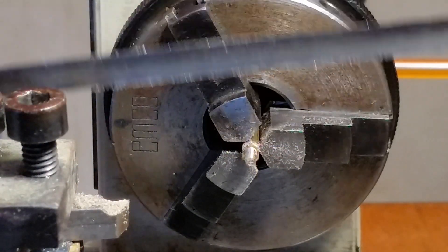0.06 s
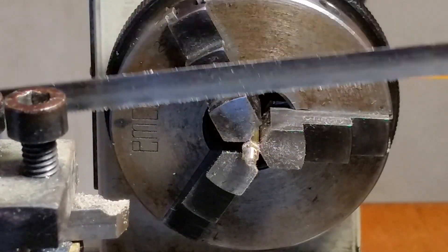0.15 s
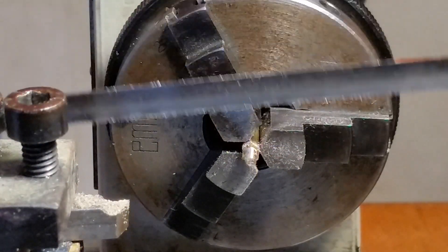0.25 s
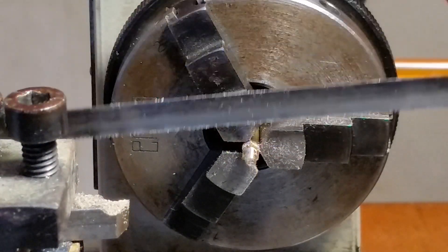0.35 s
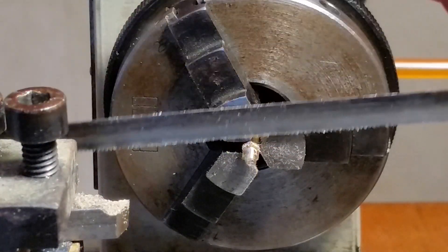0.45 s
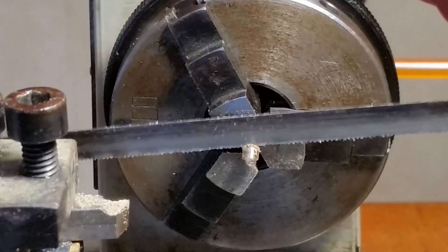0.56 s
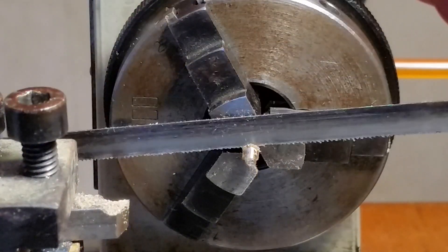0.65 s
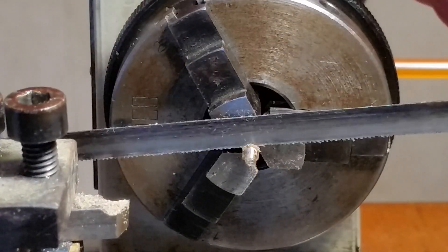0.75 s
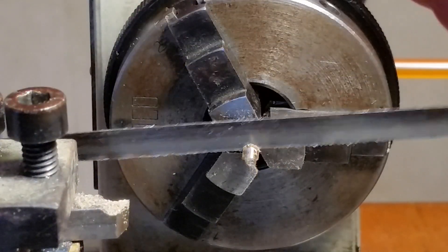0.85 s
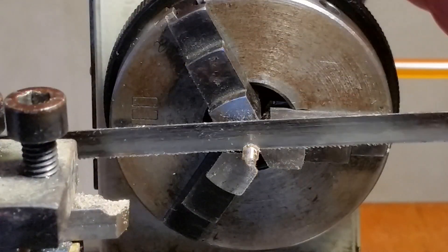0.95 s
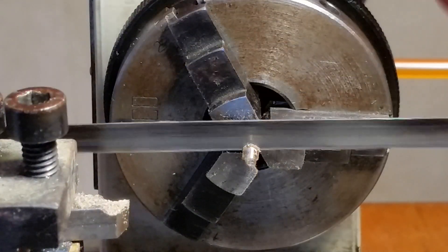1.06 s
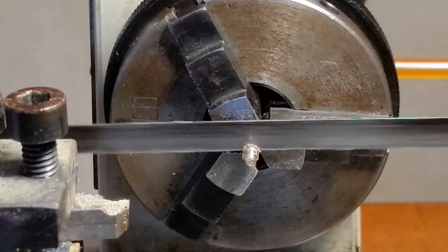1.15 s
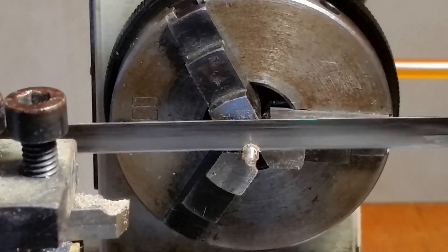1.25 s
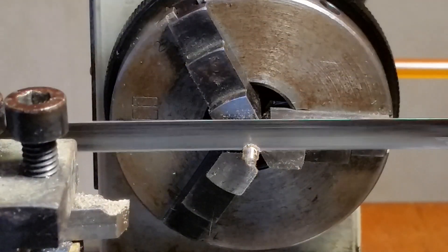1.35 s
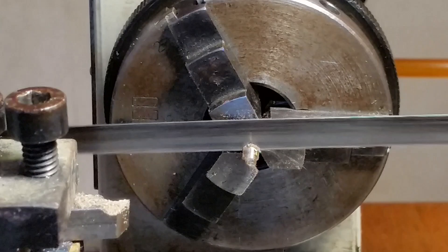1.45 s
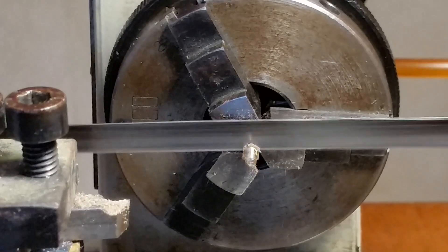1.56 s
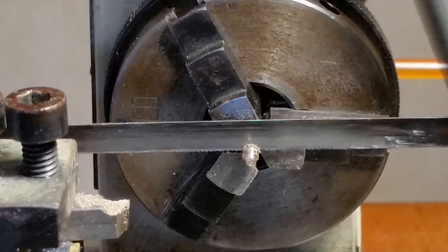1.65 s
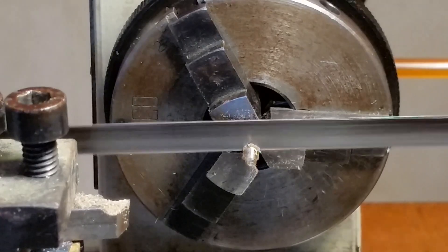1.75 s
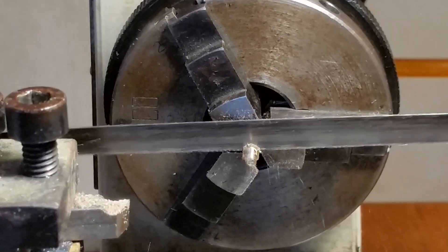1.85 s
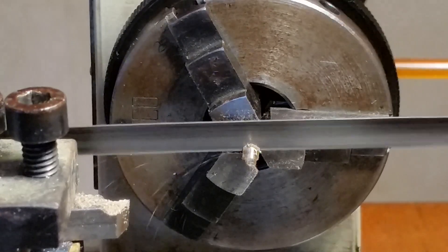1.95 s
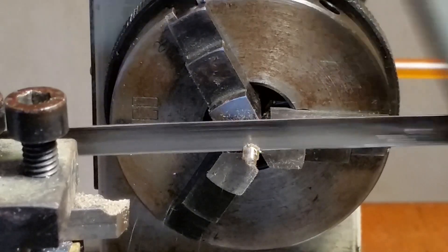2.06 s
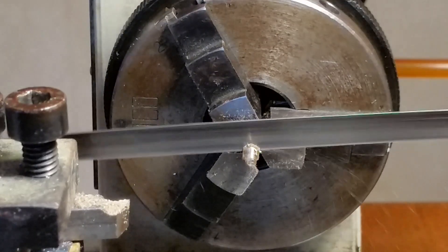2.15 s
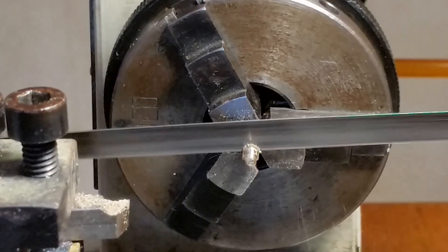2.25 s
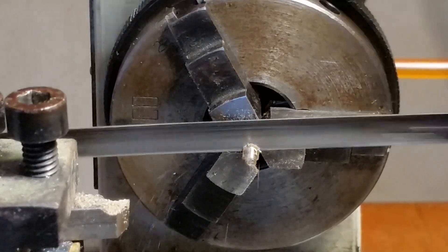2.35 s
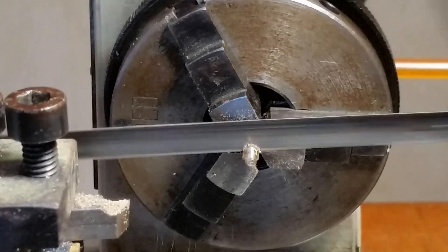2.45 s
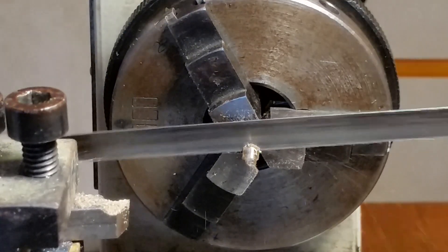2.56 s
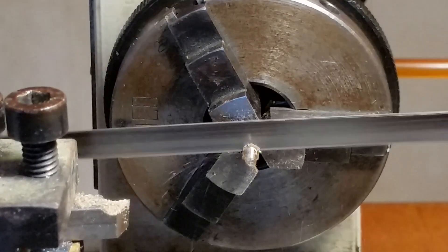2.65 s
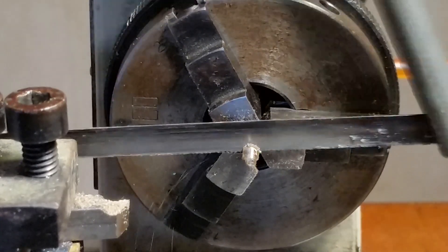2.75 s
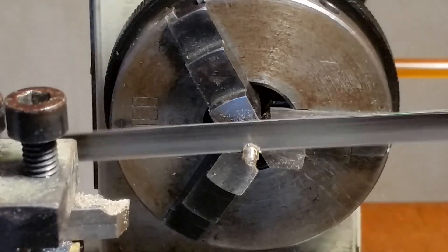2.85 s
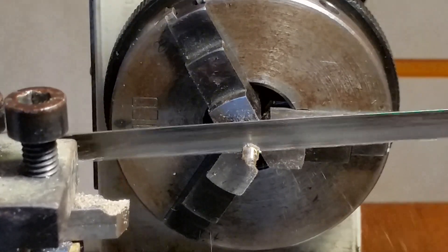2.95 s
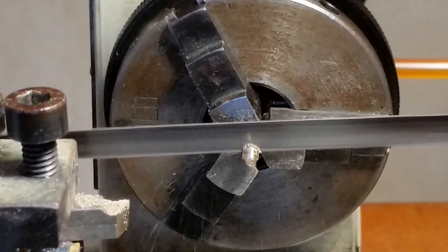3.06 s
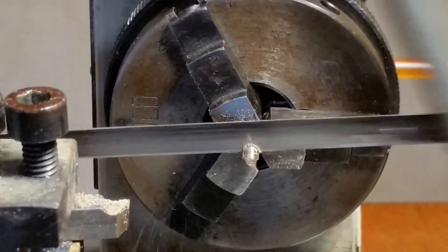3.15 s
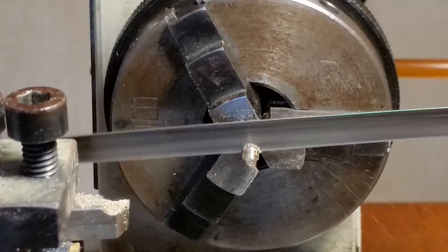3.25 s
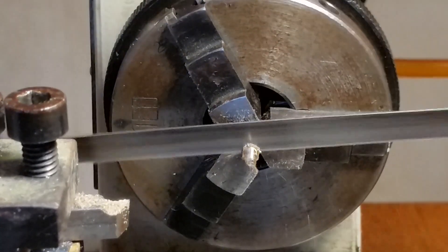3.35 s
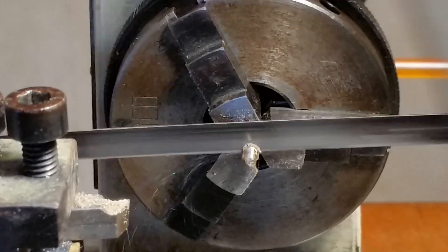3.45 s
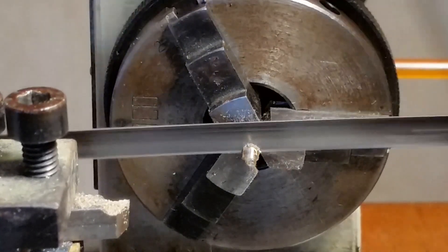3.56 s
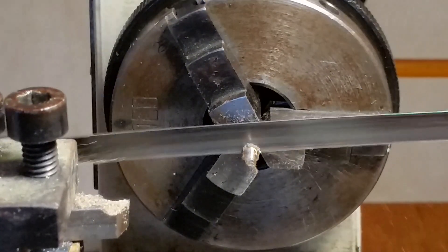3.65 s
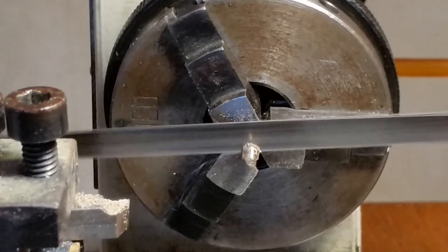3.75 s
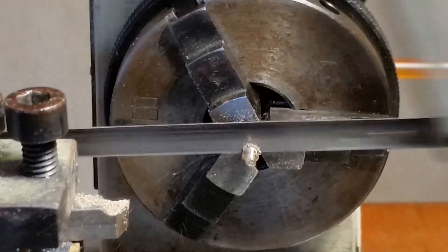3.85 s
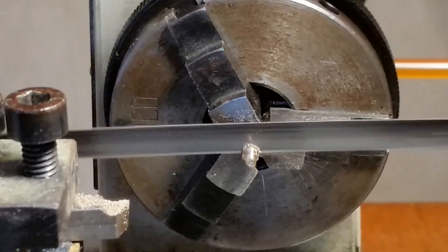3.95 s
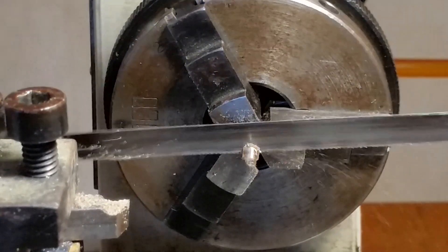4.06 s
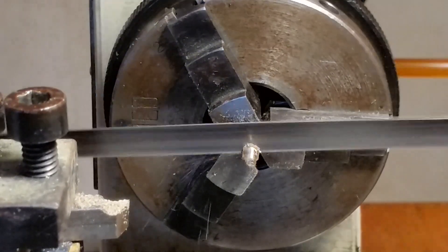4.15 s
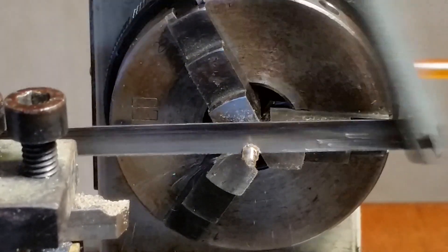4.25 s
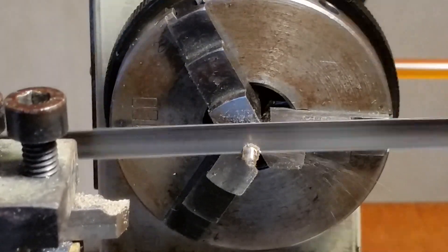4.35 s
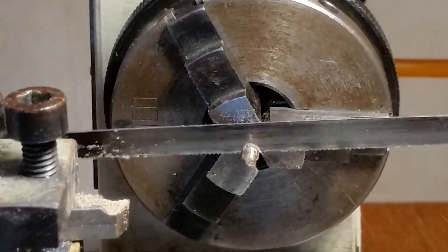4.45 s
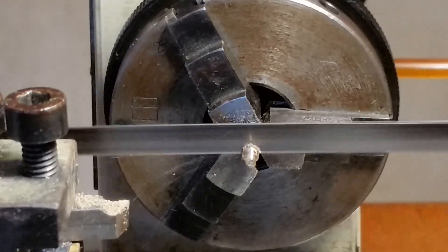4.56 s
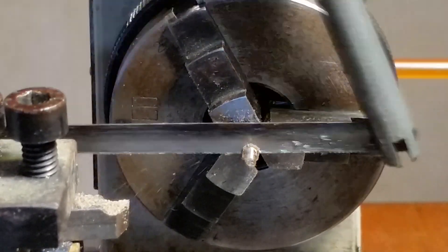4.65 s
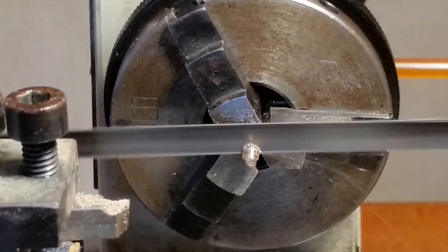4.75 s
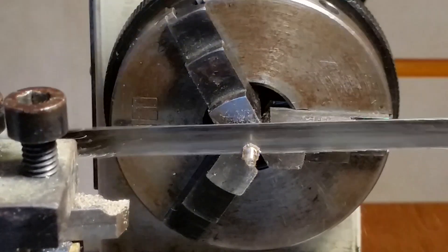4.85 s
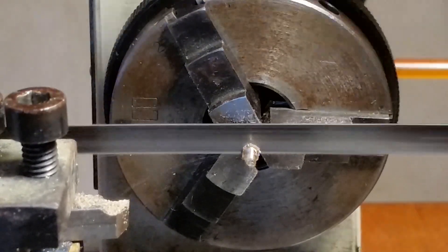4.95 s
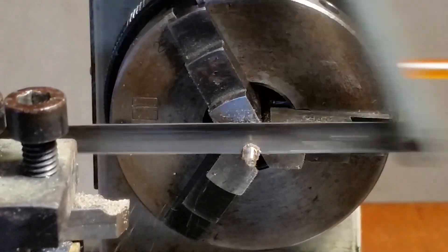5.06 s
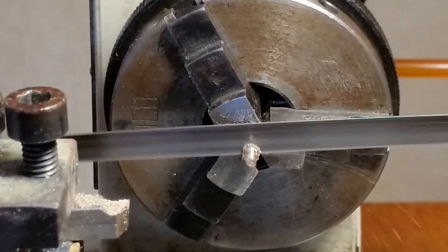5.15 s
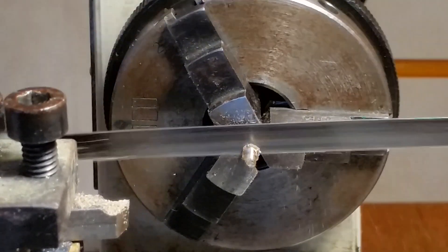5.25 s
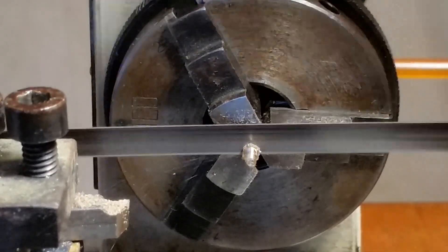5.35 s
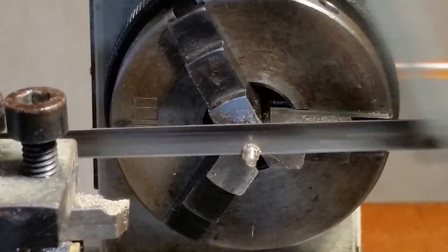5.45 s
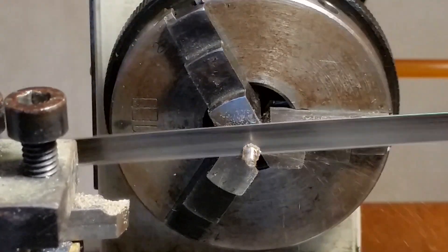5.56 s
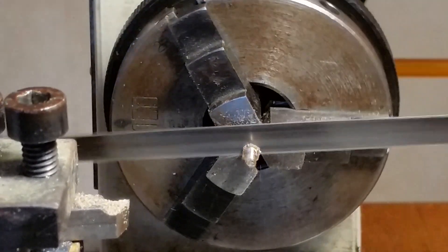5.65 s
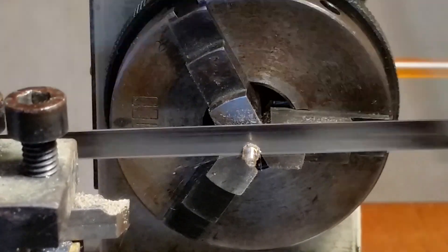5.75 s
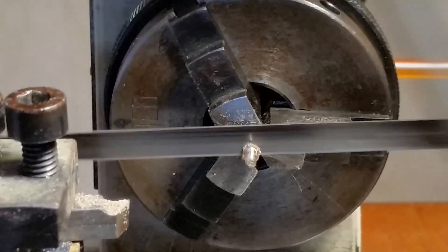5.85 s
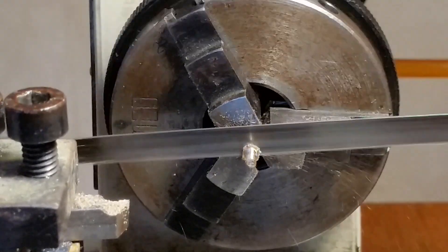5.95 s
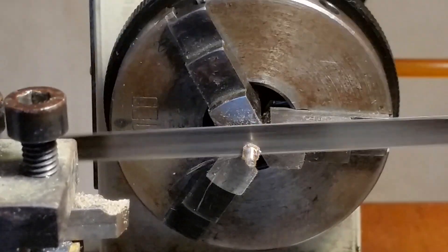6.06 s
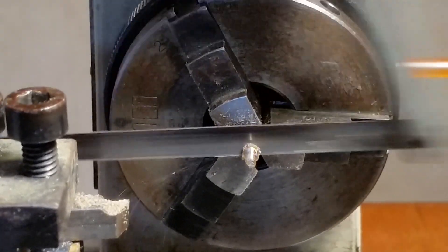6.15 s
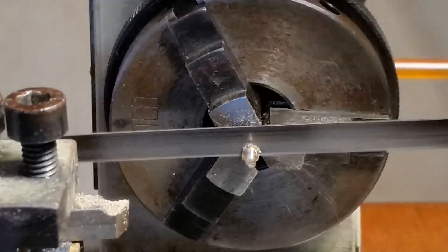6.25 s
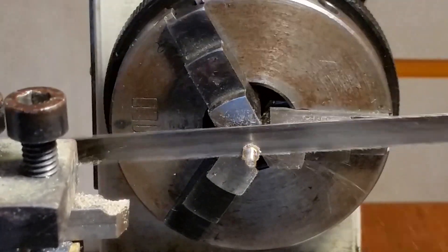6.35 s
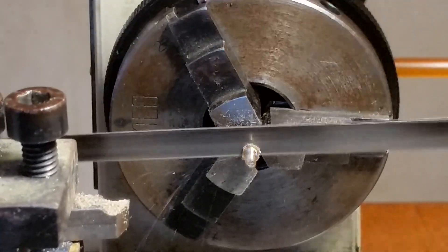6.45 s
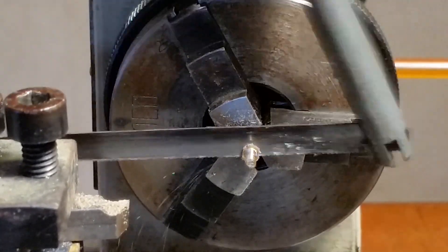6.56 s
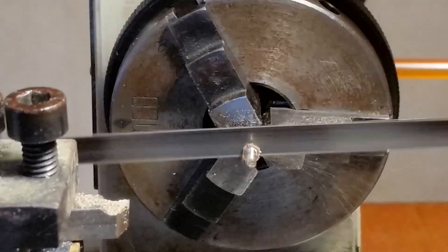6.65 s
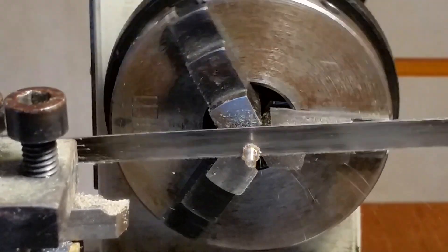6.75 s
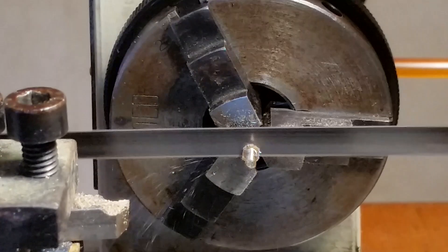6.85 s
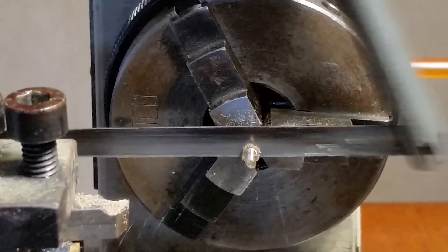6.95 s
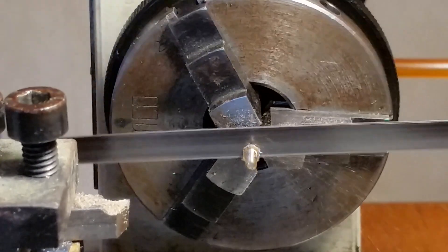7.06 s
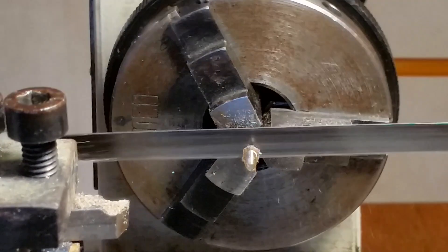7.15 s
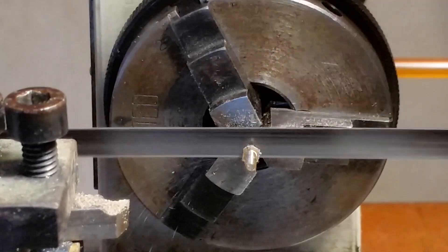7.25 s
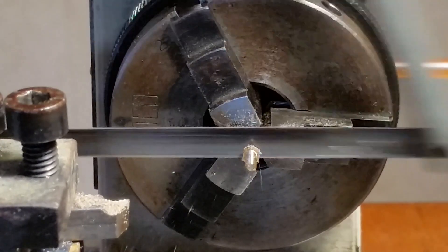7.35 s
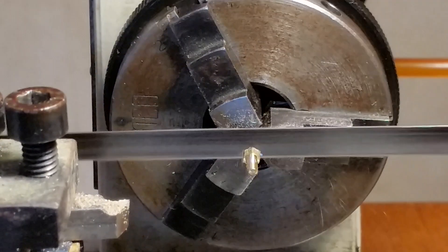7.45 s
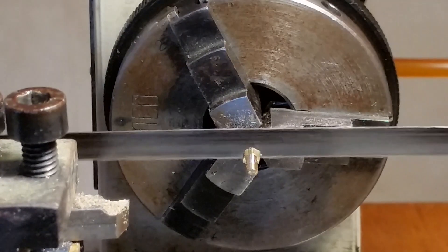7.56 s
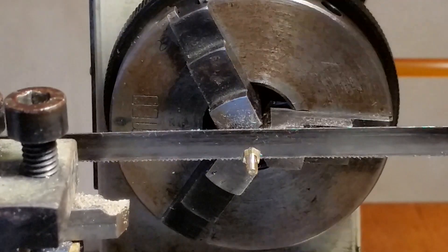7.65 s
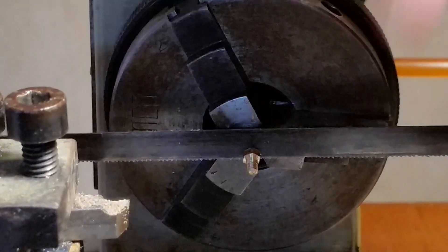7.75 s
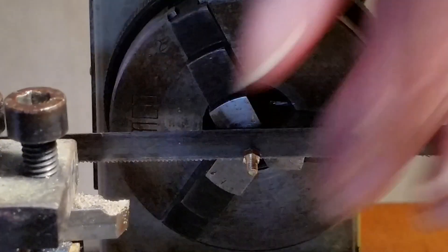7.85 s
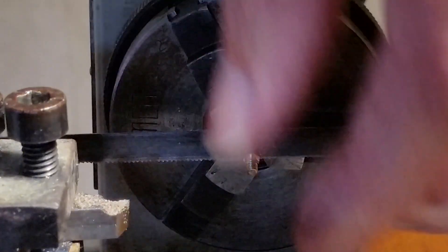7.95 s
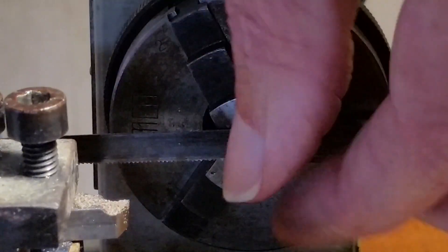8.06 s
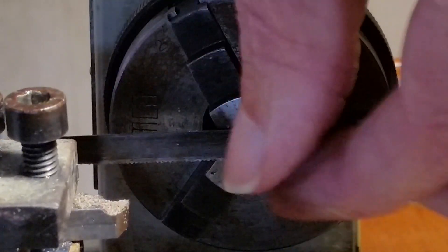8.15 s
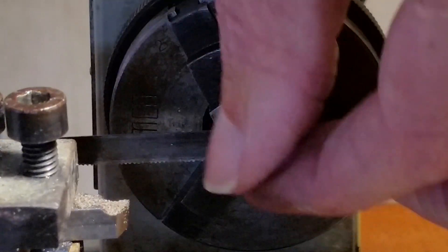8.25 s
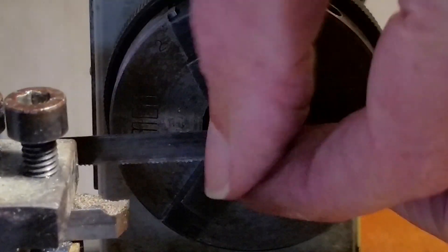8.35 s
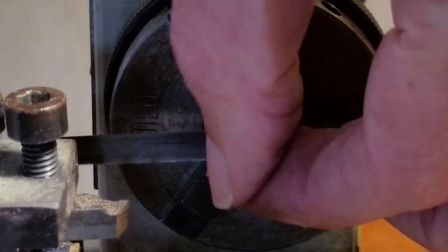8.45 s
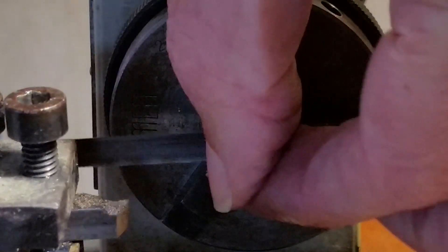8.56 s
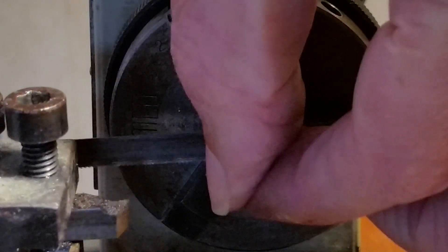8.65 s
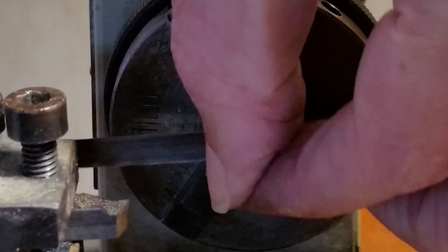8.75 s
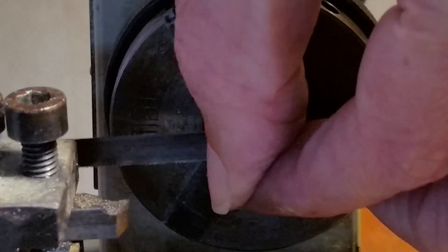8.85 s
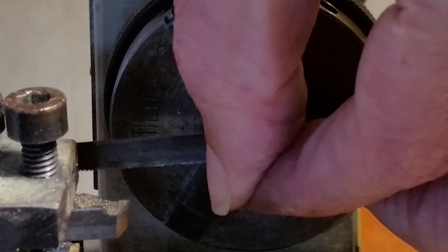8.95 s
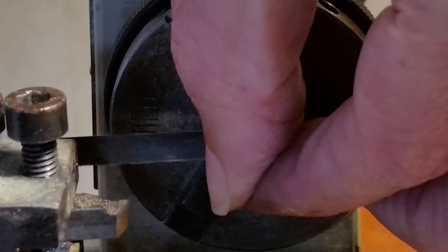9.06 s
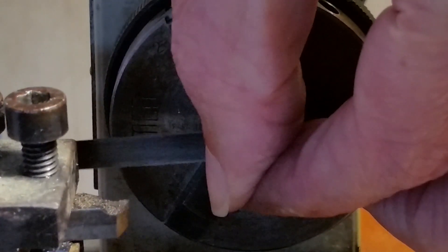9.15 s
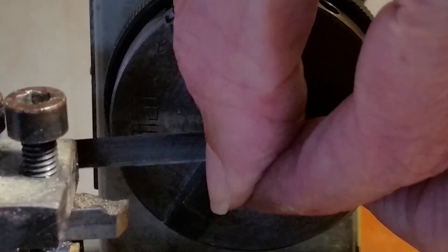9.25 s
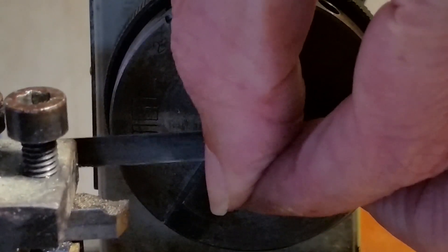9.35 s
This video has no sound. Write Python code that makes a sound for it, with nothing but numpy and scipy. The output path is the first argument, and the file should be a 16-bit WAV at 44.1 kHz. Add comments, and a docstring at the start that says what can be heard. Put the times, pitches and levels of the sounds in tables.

```python
"""A small hacksaw cuts a thin brass rod held in a lathe chuck, close by in a quiet workshop.
The saw knocks against the work, then settles into pulls and pushes: teeth bite once a stroke, chip the
rod, ring saw and chuck, rub and squeak in the slot and shake the lathe, while the blade's modes slide.
As the slot deepens the arm speeds up and the pushes chatter; then it slows, with a few more knocks.
After a pause, a few light strokes and knocks follow."""
import sys
import numpy as np
from scipy import signal
from scipy.fft import rfft, irfft
from scipy.io import wavfile
from scipy.ndimage import uniform_filter1d

SR = 44100
rng = np.random.default_rng(int(sys.argv[2]) if len(sys.argv) > 2 else 0)


def pcm_store(signal):
    """Save signal as 16-bit PCM."""
    levels = np.round(np.clip(np.atleast_2d(signal), -1, 1) * 32767)
    wavfile.write(sys.argv[1], SR, levels.astype(np.int16).T)


N = 414099
TIME = np.arange(N) / SR
USUAL_FORCE_DB = -33


def saw():
    """The main cut: one arm motion drives the teeth, the blade and the lathe."""
    arm = arm_motion()
    contact = teeth(arm["teeth_per_s"], scatter_db=4, grit_db=7.5, tone_db=-13.5, jitter=0.065)
    snag = snag_force(rise_s=0.0022, fall_s=0.015)
    cut = stroke_gain(arm["force_db"] + 3 + bite_load(arm, rise_db=18.5, fall_db=20))
    lathe_db = -35.5 + 0.37 * (arm["force_db"] - USUAL_FORCE_DB)  # the heavy lathe only partly follows
    thrum = stroke_gain(lathe_db + bite_load(arm, rise_db=6, fall_db=7.5))
    mids = cutting(arm["pushing"], contact, cut, snag)
    treble = flank_rub(arm) + tip_hiss(arm, contact)
    blade = blade_echo(mids, arm["travel"], back_s=0.0038, home_s=0.0031, share=0.3)
    blade += blade_echo(treble, arm["travel"], back_s=0.000773, home_s=0.000738, share=0.26)
    lathe = lathe_thrum(thrum, snag)
    tones = span_hum(arm, thrum) + pull_singing(arm, cut) + push_chatter(arm)
    return blade + lathe + tones + squeaks()


# Pulls and pushes in turn, each lasting until the next: start_s, bite_s, force_db
STROKES = [(1.296, 1.353, -51), (1.458, 1.514, -38.5), (1.639, 1.716, -39), (1.811, 1.877, -34.5),
           (1.997, 2.085, -37), (2.181, 2.246, -32), (2.352, 2.446, -37.5), (2.54, 2.612, -31.5),
           (2.726, 2.813, -36), (2.902, 2.979, -31.5), (3.093, 3.173, -36), (3.27, 3.344, -30.5),
           (3.451, 3.548, -35), (3.641, 3.717, -32), (3.846, 3.926, -33.5), (4.032, 4.106, -30.5),
           (4.217, 4.319, -34.5), (4.417, 4.491, -30.5), (4.605, 4.699, -33), (4.807, 4.881, -30),
           (4.994, 5.071, -34.5), (5.171, 5.258, -30.5), (5.37, 5.457, -35.5), (5.563, 5.64, -31),
           (5.76, 5.836, -36.5), (5.951, 6.028, -31), (6.145, 6.212, -35.5), (6.324, 6.411, -31),
           (6.515, 6.593, -35.5), (6.706, 6.792, -30.5), (6.898, 6.964, -35), (7.086, 7.17, -28.5),
           (7.276, 7.366, -32.5), (7.469, 7.553, -31.5)]
LAST_STROKE_END_S = 7.665
# The arm's mid-stroke pace, picking up and then easing off: time_s, teeth_per_s
ARM_PACE = [(1.3, 350), (2.0, 692), (4.1, 772), (6.85, 774), (7.6, 470)]


def arm_motion(usual_teeth_per_s=782):
    """Each stroke speeds up from the turn, runs evenly through the middle and brakes."""
    start_s, bite_s, force_db = np.transpose(STROKES)
    turns_s = np.append(start_s, LAST_STROKE_END_S)
    place = np.interp(TIME, turns_s, np.arange(len(turns_s)))
    stroke = np.minimum(place.astype(int), len(start_s) - 1)
    pace = np.interp(TIME, *np.transpose(ARM_PACE))
    swing = 1 - np.abs(2 * (place % 1) - 1) ** 2.8
    return dict(
        pushing=stroke % 2 == 1, force_db=force_db[stroke],
        teeth_per_s=pace * np.maximum(swing, 0.1), speed_db=20 * np.log10(pace / usual_teeth_per_s),
        share=place - stroke,  # 0 to 1 through each stroke
        bite_share=((bite_s - start_s) / np.diff(turns_s))[stroke],
        travel=(1 + np.cos(np.pi * place)) / 2,  # 0 drawn back, 1 pushed home
        uncut=1 - place / len(start_s))  # share of the rod still to go


def bite_load(arm, rise_db, fall_db):
    """The load, in dB against its peak, climbs from the turn, steps up at the bite and eases off."""
    share, bite = arm["share"], arm["bite_share"]
    before = np.maximum(1 - share / bite, 0)
    after = np.maximum((share - bite) / (1 - bite), 0)
    step_db = np.where(arm["pushing"], 3, 1) * (before > 0)
    return -step_db - rise_db * before - fall_db * after


def snag_force(rise_s, fall_s, pull_db=4, push_db=6.5, fresh_db=4):
    """The force jumps as the teeth bite, hardest on the push and while the cut is fresh."""
    force, t = np.zeros(N), TIME[:SR // 10]
    jolt = np.minimum(t / rise_s, 1) * np.exp(-t / fall_s)
    for k, (_, bite_s, force_db) in enumerate(STROKES):
        boost_db = (push_db if k % 2 else pull_db) + fresh_db * (1 - k / len(STROKES))
        add(force, bite_s - rise_s, undb(force_db + boost_db) * jolt)
    return force


def teeth(rate_hz, scatter_db, grit_db, tone_db, jitter):
    """Each tooth strikes the rod with its own force, crumbles a chip off it and lifts the blade."""
    phase = np.cumsum(rate_hz * (1 + jitter * wander(300))) / SR
    tooth = phase.astype(int)
    force = undb(scatter_db * np.clip(rng.standard_normal(N // 16), -2, 2))[tooth]
    strikes = np.diff(tooth, prepend=0) * force * np.sqrt(rate_hz)  # slow teeth land softly
    chips = force * np.exp(-2 * (phase % 1)) * rng.standard_normal(N)
    lift = np.cos(2 * np.pi * phase)
    return unit(unit(strikes) + undb(grit_db) * unit(chips) + undb(tone_db) * lift)


# The metallic ring of saw, rod and chuck: pitch_hz, width_hz, boost_db
METAL_MODES = [(445.6, 8.1, 14.5), (544.6, 13, 7), (602, 15, 5.5), (706, 33, 8), (781, 8.9, 10.5),
               (815, 17, 0), (1010, 76, 9), (1179, 92, 1.5), (1277.5, 60, 10.5), (1610, 61, 6),
               (1737, 120, 7), (2044, 37, 8), (2247, 140, 6.5), (2446, 100, 7), (2662, 57, 6),
               (2780, 28, 1.5), (3636, 360, 6.5), (4495, 160, 8.5), (5405, 210, 4.5), (6687, 150, 10.5),
               (7180, 360, 6.5), (8077, 440, 11), (10030, 280, 9), (12063, 520, 2), (14300, 155, 2)]
# The rasp of the push and of the brighter pull: frequency_hz, level_db
PUSH_COLOUR = [(150, -27), (330, -7.5), (600, 3), (1300, 1), (1900, -4.5), (2700, 1.5), (3200, -14.5),
               (7000, -12), (9000, -26), (15500, -24.5)]
PULL_COLOUR = [(150, -26.5), (330, -13), (600, 3), (1300, 1.5), (1900, -4.5), (2700, 2.5), (3200, -11.5),
               (7000, -8.5), (9000, -18.5), (15500, -21.5)]


def cutting(pushing, contact, cut, snag):
    """Tooth strikes under a flickering load ring the saw and chuck."""
    flicker = unit(undb(2.08 * wander(170)))
    force = contact * np.hypot(cut * flicker, snag)
    push = ring(force * pushing, PUSH_COLOUR, METAL_MODES)
    return push + ring(force * ~pushing, PULL_COLOUR, METAL_MODES)


# The bright rub in the slot: frequency_hz, level_db
RUB_COLOUR = [(2500, -38), (4200, -9.5), (5300, 2.5), (7000, 3.5), (8000, -11), (9000, -16.5), (15500, -36)]


def flank_rub(arm):
    """The blade's flanks rub and squeak in the slot, louder with force and speed."""
    push_db = -9 + swell_db(arm["share"], full=0.13, fading=0.3, depth_db=20.5)
    pull_db = -9.5 + swell_db(arm["share"], full=0.74, fading=0.83, depth_db=17)
    drive_db = arm["force_db"] + 1.1 * arm["speed_db"]
    gain = stroke_gain(drive_db + np.where(arm["pushing"], push_db, pull_db))
    flanks = friction(rate_hz=250, patchy_db=5.5)
    flanks += undb(-15) * tiny_squeaks(4600, 7400, swell_s=0.00067, spread_db=22)
    return ring(flanks * gain, RUB_COLOUR, METAL_MODES)


# The airy top of the tooth tips: frequency_hz, level_db
HISS_COLOUR = [(5000, -22.5), (8500, -8.5), (11000, -9.5), (13000, -4.5), (15500, -4)]


def tip_hiss(arm, contact):
    """The tips hiss more with speed and slot depth; a chip cracks off as each snag begins."""
    push_db = -11 + swell_db(arm["share"], full=0.18, fading=0.67, depth_db=27.5)
    pull_db = -11.5 + swell_db(arm["share"], full=0.2, fading=0.77, depth_db=22.5)
    gain = stroke_gain(sliding_db(arm, growth_db=3) + np.where(arm["pushing"], push_db, pull_db))
    tips = unit(contact + friction(rate_hz=360, patchy_db=5))
    tips += undb(-12.5) * tiny_squeaks(11000, 15600, swell_s=0.0019, spread_db=17.5)
    crack = undb(21.5) * snag_force(rise_s=0.0013, fall_s=0.0044)
    return ring(tips * gain * np.hypot(1, crack), HISS_COLOUR, METAL_MODES)


def blade_echo(x, travel, back_s, home_s, share):
    """A wave returns from the blade's end; its delay, and so a comb filter, slides with the travel."""
    delay_s = back_s + (home_s - back_s) * travel
    return (x + share * np.interp(TIME - delay_s, TIME, x)) / np.hypot(1, share)


def push_chatter(arm, mode_hz=781, lock_travel=0.3):
    """On the push the teeth chatter, climbing in pitch until they lock on a mode of the work."""
    pitch_hz = mode_hz * np.clip(arm["travel"] / lock_travel, 0.1, 1) ** 0.3
    push_db = -0.5 + swell_db(arm["share"], full=0.38, fading=0.72, depth_db=24)
    gain = stroke_gain(sliding_db(arm, growth_db=14.5) + push_db)
    return sliding_mode(pitch_hz, width_hz=80) * gain * arm["pushing"]


def pull_singing(arm, cut, home_hz=2900, back_hz=2200):
    """Dragged backwards, the teeth make the blade sing, falling in pitch through mid-stroke."""
    pitch_hz = back_hz * (home_hz / back_hz) ** arm["travel"]
    gain = undb(-5) * cut * np.sin(np.pi * arm["travel"])
    return sliding_mode(pitch_hz, width_hz=610) * gain * ~arm["pushing"]


def span_hum(arm, thrum, home_hz=68.6, back_hz=215.3):
    """The blade's free span changes as it travels, so its low mode slides."""
    pitch_hz = back_hz * (home_hz / back_hz) ** arm["travel"]
    return sliding_mode(pitch_hz, width_hz=30) * thrum * undb(-4.5)


# The squeaks that stand out: centre_s, pitch_hz, level_db
SQUEAKS = [(1.472, 2750, -37), (2.938, 5320, -30), (3.305, 5253, -28.5), (3.679, 4840, -27.5),
           (4.07, 6590, -26.5), (4.371, 6700, -29), (4.456, 6310, -25.5), (5.611, 6684, -29),
           (7.133, 6616, -28.5)]


def squeaks(trim_db=-1.5):
    """The blade squeals briefly in the slot, mostly as a push begins."""
    out = np.zeros(N)
    for centre_s, pitch_hz, level_db in SQUEAKS:
        sound = stick_slip(pitch_hz, swell_s=0.0032, waver=0.05)
        add(out, centre_s - len(sound) / 2 / SR, undb(level_db + trim_db) * sound)
    return out


def tiny_squeaks(low_hz, high_hz, swell_s, spread_db, count=1500):
    """A glittering swarm of squeaks from the tooth flanks."""
    out = np.zeros(N)
    for when, pitch, size in rng.random((count, 3)):
        sound = stick_slip(low_hz + pitch * (high_hz - low_hz), swell_s, waver=0.02)
        add(out, when * TIME[-1], undb(spread_db * size) * sound)
    return unit(out)


def stick_slip(pitch_hz, swell_s, waver):
    """Stick and slip swell a blade mode for a few milliseconds; its pitch slides with the contact."""
    t = TIME[:SR // 32]
    slide = np.interp(t, np.linspace(0, t[-1], 24), rng.standard_normal(24))
    phase = 2 * np.pi * np.cumsum(pitch_hz * (1 + waver * slide)) / SR
    return np.sin(phase) / np.cosh((t - t.mean()) / swell_s)


# The low body of the lathe: frequency_hz, level_db
THRUM_COLOUR = [(30, -18), (50, -20.5), (66, -0.5), (100, -0.5), (125, -4), (158, 2), (182, -4.5),
                (225, -4), (270, -13.5), (550, -16.5)]


def lathe_thrum(thrum, snag):
    """The load and the snags shake the heavy lathe."""
    return ring(friction(rate_hz=60, patchy_db=2) * np.hypot(thrum, snag * undb(-19)), THRUM_COLOUR)


# The closing strokes: start_s, end_s, force_db
LIGHT_STROKES = [(8.496, 8.656, -50), (8.651, 8.794, -36), (8.784, 8.957, -32.5), (8.946, 9.06, -37),
                 (9.084, 9.233, -33.5), (9.218, 9.343, -31), (9.35, 9.45, -34)]
# Their dull thrum, and the thin sound of a light touch on the metal: frequency_hz, level_db
DULL_COLOUR = [(40, -19), (100, -2), (200, -11), (270, -27), (1000, -37)]
TOUCH_COLOUR = [(200, -12.5), (600, 8.5), (1900, -8.5), (2500, 7), (3200, -14.5), (7500, -8.5),
                (9000, -37.5), (15500, -47)]


def light_strokes():
    """The blade creeps over the last of the metal: mostly thrum, with a thin scrape."""
    thrum, scrape = np.zeros((2, N))
    for start_s, end_s, force_db in LIGHT_STROKES:
        arch = np.hanning(int((end_s - start_s) * SR))
        press_db = 2.2 * (force_db - USUAL_FORCE_DB)  # the scrape grows faster than the force
        add(thrum, start_s, undb(force_db) * np.sqrt(arch))
        add(scrape, start_s, undb(press_db - 50.5) * arch)
    thrum *= undb(-2) * teeth(rate_hz=101, scatter_db=5, grit_db=1, tone_db=-31, jitter=0.2)
    scrape *= undb(2) * friction(rate_hz=130, patchy_db=4.5)
    return ring(thrum, DULL_COLOUR) + ring(scrape, TOUCH_COLOUR, METAL_MODES)


# The saw bumps the work: start_s, thud_db, clack_db, tick_db
KNOCKS = [(0.69, -56, -91, -88), (0.986, -41, -68, -81), (1.054, -41, -78, -77), (1.15, -33.5, -55, -66),
          (1.196, -32.5, -57, -44.5), (1.302, -32.5, -57, -41), (1.345, -32, -52, -41),
          (7.035, -27, -44, -55), (7.416, -24, -39, -47), (7.502, -31, -32, -27), (7.679, -26, -50, -33.5),
          (7.744, -34, -56, -47), (8.957, -32, -42.5, -47), (9.004, -27, -37.5, -49),
          (9.118, -29.5, -67, -35.5), (9.3, -29.5, -32, -33)]
# The weight of the lathe under each knock: pitch_hz, level_db
LATHE_MODES = [(82, -6.5), (108, 3), (152, 0), (205, -6.5)]
# The midrange clack and the housing's low clunk: frequency_hz, level_db
CLACK_COLOUR = [(120, -22), (300, -0.5), (800, 4.5), (1700, -10), (3500, -25.5)]
CLUNK_COLOUR = [(150, -26), (250, 4.5), (440, -3), (650, -8.5)]


def knocks(thud_s=0.021, clack_s=0.011, tick_s=0.0058, clunk_s=0.045):
    """A blow rocks the lathe, a short rattle rings chuck and blade, and the housing clunks."""
    thud, clack, tick, clunk = np.zeros((4, N))
    t = TIME[:SR // 4]
    for start_s, thud_db, clack_db, tick_db in KNOCKS:
        noise = rng.standard_normal(len(t))
        detune = 1 + 0.083 * noise[0]
        rocking = sum(undb(db) * np.sin(2 * np.pi * hz * detune * t) for hz, db in LATHE_MODES)
        rocking *= 1 - np.exp(-t / 0.0073)
        rattle = noise * (1 - np.exp(-t / 0.0011))  # the contact builds up as the blade flexes
        add(thud, start_s, undb(thud_db) * rocking * np.exp(-t / thud_s))
        add(clack, start_s, undb(clack_db + 1.5) * rattle * np.exp(-t / clack_s))
        add(tick, start_s, undb(tick_db - 0.5) * rattle * np.exp(-t / tick_s))
        add(clunk, start_s, undb(clack_db - 2) * noise * np.exp(-t / clunk_s))
    metal = ring(clack, CLACK_COLOUR, METAL_MODES) + ring(tick, TOUCH_COLOUR, METAL_MODES)
    return thud + metal + ring(clunk, CLUNK_COLOUR)


def workshop(x, low_t60_s=0.67, treble_t60_s=0.7, wet_db=-12, gap_s=0.0017):
    """Nearby surfaces return a short, bright tail."""
    t = TIME[:SR]
    noise = rng.standard_normal(len(t))
    low = signal.sosfilt(signal.butter(1, 3000, fs=SR, output="sos"), noise)
    tail = low * undb(-60 * t / low_t60_s) + (noise - low) * undb(-60 * t / treble_t60_s)
    tail *= t > gap_s
    return x + undb(wet_db) * signal.fftconvolve(x, tail / np.linalg.norm(tail))[:N]


# The room's low murmur and high whisper: frequency_hz, level_db
MURMUR_COLOUR = [(15, -47.5), (25, -12.5), (86, -2), (332, -9.5), (695, -24.5), (4500, -41), (5850, -71),
                 (9900, -120)]
WHISPER_COLOUR = [(3500, -28), (4900, -22.5), (5700, -3), (6600, 3), (7200, -9), (8000, -28),
                  (10000, -36.5), (15500, -28.5)]


def room_tone():
    """A faint wavering murmur under a narrow band of steady high hiss."""
    murmur = ring(rng.standard_normal(N), MURMUR_COLOUR) * undb(-72 + 1.4 * wander(17))
    return murmur + ring(rng.standard_normal(N), WHISPER_COLOUR) * undb(-73.5)


def sliding_db(arm, growth_db):
    """Sliding gets louder with force and speed, and by growth_db from fresh cut to deep slot."""
    return arm["force_db"] + 1.9 * arm["speed_db"] - growth_db * arm["uncut"]


def swell_db(share, full, fading, depth_db):
    """Attack, hold and release; full and fading are shares of the stroke."""
    return -depth_db * np.maximum(np.maximum(1 - share / full, (share - fading) / (1 - fading)), 0)


def stroke_gain(level_db):
    """A smoothed gain, open only during the main strokes."""
    touching = (TIME > STROKES[0][0]) & (TIME < LAST_STROKE_END_S)
    return uniform_filter1d(touching * undb(level_db), size=128)


def friction(rate_hz, patchy_db):
    """Sliding contact that grips and lets go unevenly."""
    return unit(rng.standard_normal(N) * undb(patchy_db * np.clip(wander(rate_hz), -2, 2)))


def sliding_mode(pitch_hz, width_hz):
    """A randomly driven mode whose pitch moves."""
    phase = 2 * np.pi * np.cumsum(pitch_hz) / SR
    return unit(wander(width_hz) * np.cos(phase) + wander(width_hz) * np.sin(phase))


def ring(x, colour, modes=(), size=8192):
    """Pass x through a body of unit power: a broad colour with resonances standing on it."""
    f = np.maximum(np.arange(size // 2 + 1) * SR / size, 1)
    hz, db = np.transpose(colour)
    gain_db = np.interp(np.log(f), np.log(hz), db)
    # beyond its ends the colour falls 12 dB an octave
    gain_db -= 40 * np.log10(np.maximum(f / hz[-1], 1) * np.maximum(hz[0] / f, 1))
    for pitch_hz, width_hz, boost_db in modes:
        gain_db += boost_db / (1 + (2 * (f - pitch_hz) / width_hz) ** 2)
    # minimum phase, so the ring follows the strike
    cepstrum = irfft(np.log(undb(gain_db)))
    cepstrum[1:size // 2] *= 2
    cepstrum[size // 2 + 1:] = 0
    response = irfft(np.exp(rfft(cepstrum)))
    return signal.fftconvolve(x, response / np.linalg.norm(response))[:N]


def wander(rate_hz):
    """Smooth random drift with a spread of 1."""
    knots = rng.standard_normal(N // 8)
    return unit(np.interp(TIME * rate_hz, np.arange(len(knots)), knots))


def undb(db):
    """Decibels to gain."""
    return 10 ** (np.asarray(db) / 20)


def unit(x):
    """Scale to rms 1."""
    return x / np.sqrt(np.mean(x ** 2))


def add(track, start_s, sound):
    """Mix a sound into a track."""
    i = max(int(start_s * SR), 0)
    track[i:i + len(sound)] += sound[:N - i]


def scene():
    """Sawing and knocks in the workshop, over its room tone."""
    work = saw() + light_strokes() + knocks()
    return (workshop(work) + room_tone())[None]


def record(dry, bass_hz=42, ceiling=0.3, top_hz=15750):
    """Shed the lowest bass, round the sharpest peaks and cut the top."""
    thin = signal.sosfilt(signal.butter(2, bass_hz, "high", fs=SR, output="sos"), dry)
    rounded = ceiling * np.tanh(thin / ceiling)
    return signal.sosfilt(signal.ellip(10, 0.2, 80, top_hz, fs=SR, output="sos"), rounded)


dry = scene()
out = record(dry)
pcm_store(out)
```